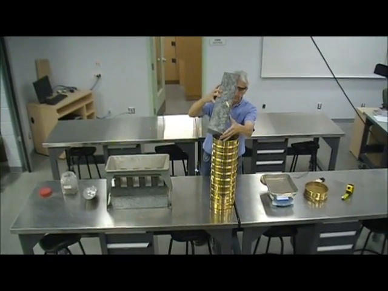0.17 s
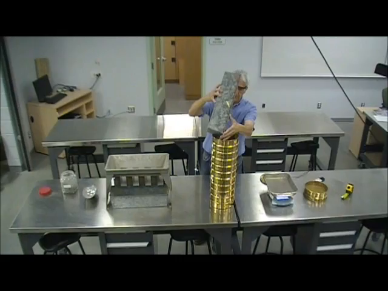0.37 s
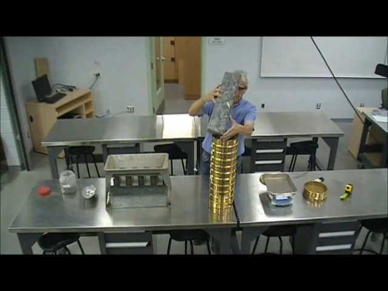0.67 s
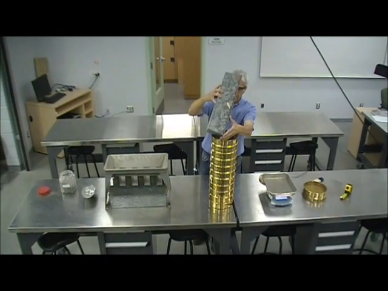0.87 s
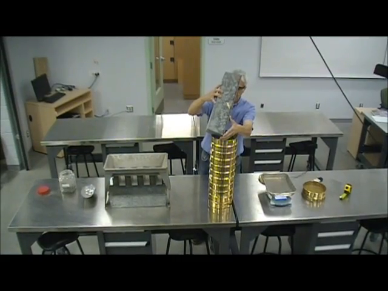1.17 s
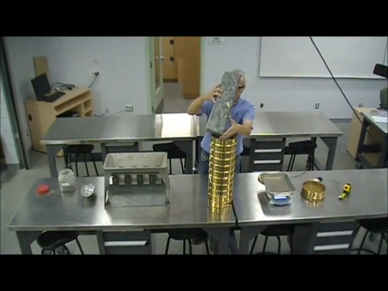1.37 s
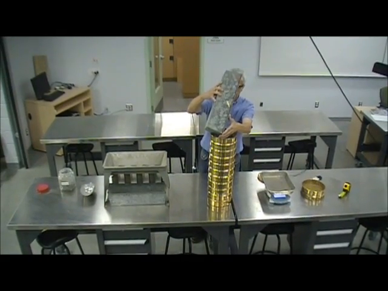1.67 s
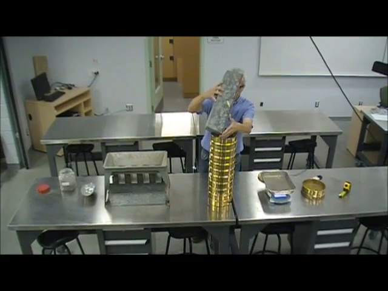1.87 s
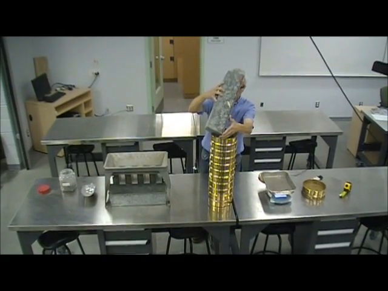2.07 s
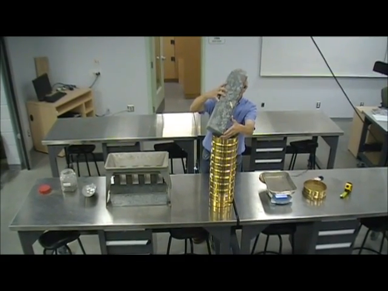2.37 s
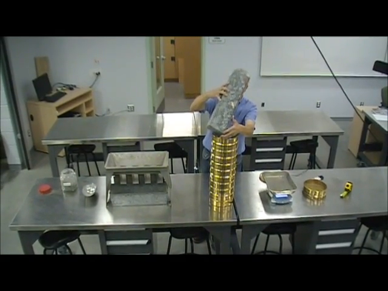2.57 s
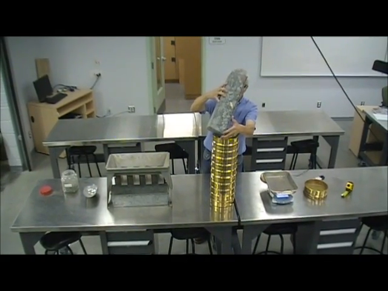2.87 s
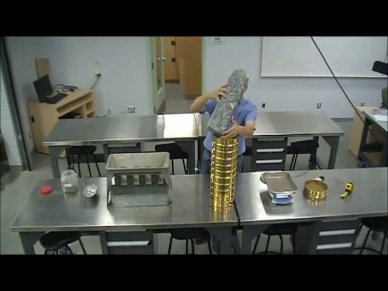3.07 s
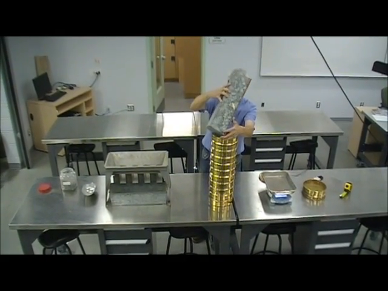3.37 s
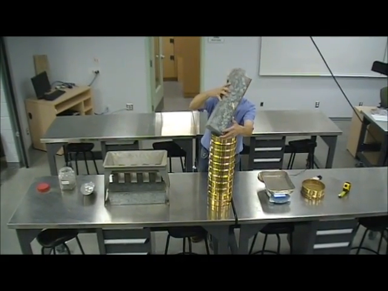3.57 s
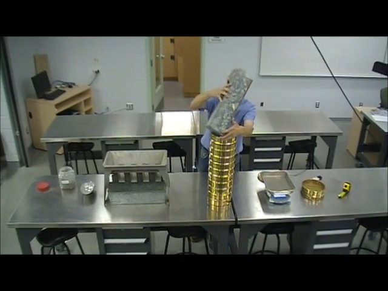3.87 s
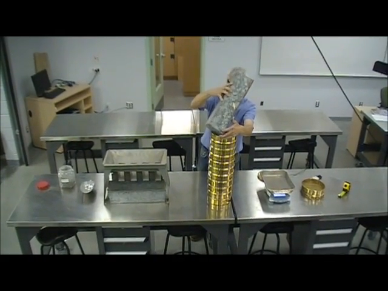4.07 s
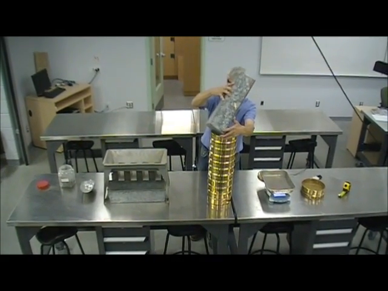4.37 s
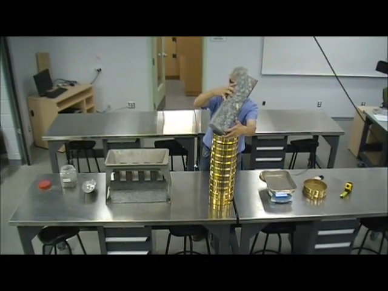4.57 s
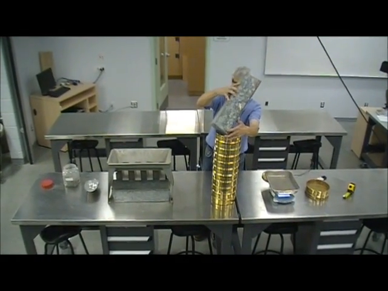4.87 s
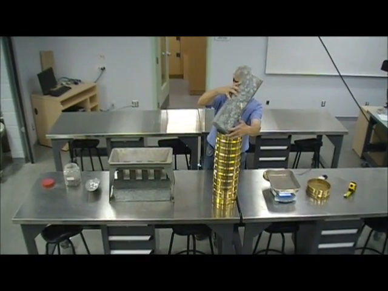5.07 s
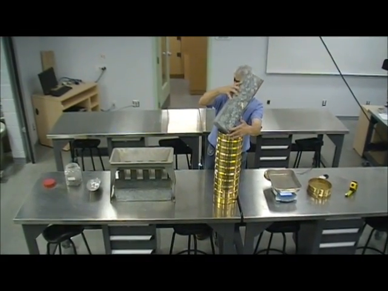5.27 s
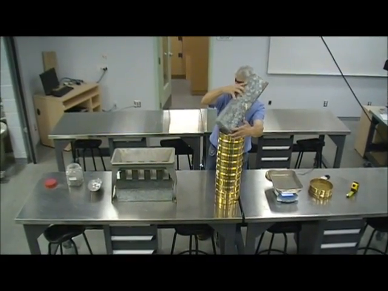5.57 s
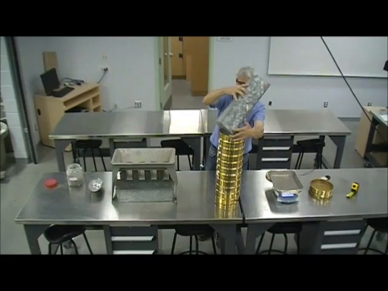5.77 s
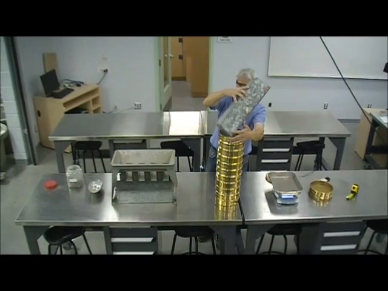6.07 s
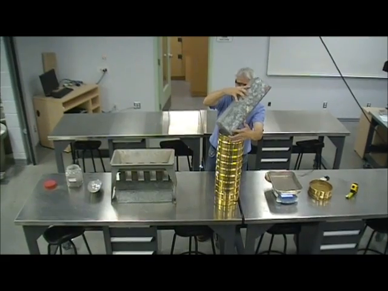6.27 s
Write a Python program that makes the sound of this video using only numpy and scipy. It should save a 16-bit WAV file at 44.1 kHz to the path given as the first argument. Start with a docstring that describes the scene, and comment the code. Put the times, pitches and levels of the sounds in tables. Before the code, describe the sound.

A dense, bright clatter of stones on wire mesh starts at once, mixed with hissing sand and faint hollow pan rumbles. It eases, surges again midway, then breaks up into separate ticks before dying out. Steady broad ventilation noise is left, swelling and then jumping louder near the end. Heard from several metres off in a reflective lab, with short splashy room decay in stereo.

```python
"""Stones and sand pour from a tilted metal pan into a stack of brass sieves in a hard-walled lab.
Each stone is a noise crack on the mesh plus decaying sines for the frames; sand is a hiss of dense ticks.
Loads sliding in the pan are noise through its hollow modes; sparse random taps give the wall reflections.
The pour thins to single stones over ventilation noise; the noise floor is heard to creep up, then step up.
A camera with two microphone ports stands some metres off."""
import sys
import numpy as np
from scipy import signal
from scipy.fft import rfft, irfft
from scipy.io import wavfile
from scipy.ndimage import uniform_filter1d

SR = 44100
rng = np.random.default_rng(int(sys.argv[2]) if len(sys.argv) > 2 else 0)


def put_to_file(sound):
    """Save the sound as 16-bit audio at rate SR, in the file named by the first command-line argument."""
    columns = np.atleast_2d(sound).T  # one column per channel
    safe = np.clip(columns, -1, 1)
    whole_steps = np.round(safe * 32767)
    wavfile.write(sys.argv[1], SR, whole_steps.astype(np.int16))


N = 284004  # length in samples


def amp(db):
    """Turns dB into gain."""
    return 10 ** (np.asarray(db) / 20)


def evened(x):
    """Scales to rms 1."""
    return x / np.sqrt(np.mean(x ** 2) + 1e-20)


def read(points, hz):
    """Reads a (frequency [Hz], value) table along a log-frequency axis."""
    f, value = np.transpose(points)
    return np.interp(np.log(hz + 1), np.log(f + 1), value)


def colour(x, db_at):
    """Filters along the last axis by a function from Hz to dB."""
    n = x.shape[-1]
    return irfft(rfft(x) * amp(db_at(np.fft.rfftfreq(n, 1 / SR))), n)


def add(mix, s, sound):
    """Mixes a sound in at s seconds."""
    part = mix[round(s * SR):][:len(sound)]
    part += sound[:len(part)]


def octaves(hz):
    """Distance from 6 kHz in octaves, held constant outside the mesh band."""
    return np.log2(np.clip(hz, 1600, 11500) / 6000)


# spectrum of the ventilation: (frequency [Hz], relative density [dB per Hz])
AIR_SPECTRUM = [(30, -9), (75, -50), (118, -5), (200, -3.5), (290, -2.5), (500, -2.5), (1390, -7.5),
                (3490, -10.5), (4300, -12.5), (9970, -21), (16000, -34.5)]
# likeness of the ventilation at the two ports: (frequency [Hz], correlation [-1 to 1])
AIR_LIKENESS = [(60, 0.81), (130, 1), (290, 0.74), (640, 0.58), (1410, 0.24), (3100, 0.47), (6820, 0.22),
                (15000, 0.12)]
AIR_LEAD_S = 4 / SR  # what both ports share reaches the left one first
# level of the noise floor as heard: even at first, then a slow rise
FLOOR_DB, FLOOR_RISE_DB_PER_S, FLOOR_RISE_FROM_S = -50, 2, 4.52
FLOOR_STEP_S, FLOOR_STEP_DB = 5.595, 7  # then a sudden step in the level heard


def ventilation(patchy_db=0.5):
    """Broad air noise: random short-time spectra with drifting patches, partly shared by the ports."""
    frames, hz = N // 256 + 5, np.fft.rfftfreq(1024, 1 / SR)
    a, b, c, d, patches = rng.standard_normal((frames, 513, 5)).T
    patches = uniform_filter1d(patches, size=12, axis=0)
    patches = evened(uniform_filter1d(patches, size=10, axis=1))
    same = np.clip(read(AIR_LIKENESS, hz), -1, 1)[:, None]
    left = a + 1j * b
    later = left * np.exp(-2j * np.pi * hz * AIR_LEAD_S)[:, None]
    right = same * later + np.sqrt(1 - same ** 2) * (c + 1j * d)
    z = np.array([left, right]) * amp(read(AIR_SPECTRUM, hz)[:, None] + patchy_db * patches)
    noise = signal.istft(z, nperseg=1024, noverlap=768)[1][:, :N]

    t = np.arange(N) / SR
    rise_db = FLOOR_RISE_DB_PER_S * np.maximum(t - FLOOR_RISE_FROM_S, 0)
    level_db = FLOOR_DB + rise_db + FLOOR_STEP_DB * (t > FLOOR_STEP_S)
    port_db = np.array([[.8], [-.8]])  # a little more on the left
    return amp(level_db + port_db) * evened(noise)


# decay of the room: (frequency [Hz], time to fall 60 dB [s])
WALL_DECAY = [(400, 0.33), (1500, 0.56), (4000, 0.5), (9000, 0.43), (15000, 0.43)]
# reflected over direct sound: (frequency [Hz], level [dB])
REFLECTED = [(500, -4), (1000, 3), (2000, 2.5), (4000, 3.5), (6500, 3.5), (9000, 0), (14000, -2)]


def tail(gap=0.005):
    """Wall reflections: sparse taps of random sign, separate for each port, each band dying at its own speed."""
    taps = np.zeros((2, SR))
    slots = np.arange(0, SR - 20, 20)  # one tap in every 20 samples
    places = slots + rng.integers(0, 20, (2, len(slots)))
    np.put_along_axis(taps, places, rng.choice([-1., 1.], (2, len(slots))), 1)
    hz, t, z = signal.stft(taps, SR, nperseg=256)
    t60 = read(WALL_DECAY, hz)[:, None]
    z = z * amp(read(REFLECTED, hz)[:, None] - 60 * t / t60) / np.sqrt(t60)
    out = signal.istft(z, SR, nperseg=256)[1]
    after_gap = np.arange(out.shape[1]) > gap * SR
    return out * np.sqrt(20 * 6 * np.log(10) / SR) * after_gap  # energy about 1 at 0 dB


def lab(x, count=10):
    """Stones land in ever other places, so sets of reflection paths crossfade, one peaking each 0.2 s."""
    turn = np.arange(N) / SR * 5
    away = [abs((turn - k + count / 2) % count - count / 2) for k in range(count)]
    shares = [np.cos(np.pi / 2 * np.minimum(a, 1)) for a in away]  # squares sum to 1
    reflected = sum(signal.fftconvolve((x * share)[None], tail(), axes=1)[:, :N] for share in shares)
    return x + reflected


# hollow modes of the pan: (frequency [Hz], width [Hz])
PAN_MODES = [(420, 40), (500, 8), (570, 12), (700, 15.5), (860, 68)]
# loads that slide down the pan: (time [s], rumble level [dB], pitch [Hz], fall [dB per s])
SLIDING_LOADS = [(.22, -52.5, 614, 2), (.48, -47.5, 650, 26), (.8, -52, 670, 54), (1.07, -43.5, 602, 45),
                 (1.39, -49, 655, 46), (1.95, -58, 670, 30), (2.2, -63, 714, 27), (2.75, -44, 710, 150),
                 (2.81, -39.5, 616, 116), (3.02, -45.5, 600, 202), (3.17, -52.5, 700, 42),
                 (3.32, -51.5, 700, 82), (3.54, -55, 750, 120), (3.87, -57, 770, 45), (4.2, -51.5, 844, 85)]
SLIDE_RISE_DB_PER_S = 214  # swell ahead of each listed time


def pan(reach_hz=220):
    """Loads sliding in the pan shake its hollow modes, most those near the pitch of the load."""
    s, rumble_db, pitch_hz, fall = np.transpose(SLIDING_LOADS)
    hz, at, z = signal.stft(rng.standard_normal(N), SR, nperseg=2048)
    modes = np.sqrt(sum(1 / (1 + (2 * (hz - f) / width) ** 2) for f, width in PAN_MODES))[:, None]
    off_pitch_hz = hz[:, None] - np.interp(at, s, pitch_hz)
    z = z * modes / (1 + (2 * off_pitch_hz / reach_hz) ** 2)
    scrape = signal.istft(z, SR, nperseg=2048)[1][:N]
    since = np.arange(N) / SR - s[:, None]
    swell_db = rumble_db[:, None] + np.minimum(SLIDE_RISE_DB_PER_S * since, -fall[:, None] * since)
    return evened(scrape) * amp(swell_db.max(0))  # the loudest load sets the level


# the pour of sand and small stones, which also covers the mesh: (time [s], relative flow [dB])
POUR_FLOW = [(0, -15), (.13, -29.5), (.22, -19), (.58, -19.5), (.78, -18), (1.0, -21), (1.3, -17),
             (1.42, -22.5), (1.86, -22.5), (2.0, -20), (2.4, -27), (2.46, -22.5), (2.52, -31.5),
             (2.66, -30), (2.84, -24.5), (2.9, -21.5), (3.08, -15.5), (3.52, -21.5), (3.65, -27),
             (3.95, -26), (4.22, -33), (4.4, -36), (4.84, -48.5), (5.3, -79)]
# brightness at a full flow [dB per octave]; a thinner flow is duller, by so much per dB
FULL_DB, FULL_TILT_DB, TILT_PER_FLOW = -19, -0.5, 0.24


def stream(count=28, grit_per_s=300, spread_db=4.5, grit_db=-3, sand_db=-5, ring_db=-6, snap_db=3,
           sand_per_s=8000, tick_db=0.0):
    """Small stones land at random over the dense ticks of sand; both follow the flow."""
    s, flow_db = np.transpose(POUR_FLOW)
    tilt_db = FULL_TILT_DB + TILT_PER_FLOW * (flow_db - FULL_DB)
    size = amp(spread_db * np.minimum(rng.exponential(1, N), 3)) * (rng.random(N) < grit_per_s / SR)
    spot = rng.integers(0, count, N)  # each spot has its own strike
    flow = amp(np.interp(np.arange(N) / SR, s, flow_db, right=-120))

    grit = np.zeros(N)
    for k in range(count):
        woken_hz = 2000 * 2 ** rng.normal(0.475, 0.86, size=2)
        hit = strike(ring_db, 0, snap_db, woken_hz)
        grit += signal.oaconvolve(size * (spot == k), hit)[:N]

    ticks = rng.standard_normal(N) * amp(tick_db * np.minimum(rng.exponential(1, N), 3))
    ticks *= rng.random(N) < sand_per_s / SR
    sand = colour(ticks, lambda hz: read(MESH_COLOUR, hz))
    both = amp(grit_db) * evened(grit) + amp(sand_db) * evened(sand)
    hz, at, z = signal.stft(both, SR, nperseg=256)
    z = z * amp(octaves(hz)[:, None] * np.interp(at, s, tilt_db))
    return flow * signal.istft(z, SR, nperseg=256)[1][:N]


# colour of a crack on the mesh: (frequency [Hz], relative level [dB])
MESH_COLOUR = [(300, -31.5), (1000, -18), (1600, -10), (2400, -6.5), (2620, -9), (3000, -4), (3500, -8),
               (4200, -3.5), (7000, -1.5), (11000, 1.5), (13000, -5), (16000, -16.5)]
# modes of the sieve frames: (frequency [Hz], relative level [dB], time to fall 60 dB [s])
FRAME_MODES = [(1175, -15, .15), (1405, -9, .2), (1750, -4, .12), (1880, -7, .15), (2304, -5, .16),
               (2390, -4, .12), (2750, -6, .14), (2878, -6, .16), (3000, -5, .14), (3073, -1, .16),
               (3220, -5, .14), (3352, -5, .18), (3645, -9, .12), (3950, -3, .12), (3995, -3, .15),
               (4180, -4, .12), (4370, -5, .12), (4990, -5, .08), (5223, -5, .1), (5477, -2, .1),
               (5770, -5, .06), (6430, -3, .07), (8068, 0, .12), (8810, -3, .07), (9242, -3, .07),
               (9790, -3, .05), (10740, -3, .05), (11000, -2, .07), (12365, -5, .07)]
WAKE_DB, WAKE_OCTAVES = 10, 0.088  # extra level at a woken place in the ring, and its reach


def strike(ring_db, tilt_db, snap_db, woken_hz, snap=0.03, rattle=0.14, bounce_db=3.0, chip_db=2.5,
           split=0.0035):
    """One stone: a snap, a bouncing, gritty rattle on the wire, and the frame modes, a quarter second in all."""
    t = np.arange(SR // 4) / SR
    lumps_db = 2.2 * rng.standard_normal(24)  # each spot favours other bands
    lumps_hz = np.linspace(0, SR / 2, 24)
    chips = rng.standard_normal(len(t)) * amp(chip_db * np.minimum(rng.exponential(1, len(t)), 5))
    noise = colour(chips, lambda hz: read(MESH_COLOUR, hz) + tilt_db * octaves(hz)
                   + np.interp(hz, lumps_hz, lumps_db))
    bounces = np.interp(t, np.linspace(0, .25, 90), rng.standard_normal(90))
    snap_fade = amp(snap_db - 60 * t / snap)
    rattle_fade = amp(bounce_db * bounces - 60 * t / rattle)
    crack = evened(noise) * (snap_fade + rattle_fade) / 5

    hz, db, t60 = np.transpose(FRAME_MODES)[:, :, None]
    luck = rng.standard_normal((2, len(FRAME_MODES), 1))
    spread_db, chatter, loosen = 2, 1.8, .04  # loosen in s
    # loose frames chatter against each other and soon break up each ring
    knots = rng.standard_normal((len(FRAME_MODES), 22))
    beats = 1 + chatter * np.minimum(t / loosen, 1) * knots[:, (t * 4 * 22).astype(int)]
    beats = uniform_filter1d(beats, size=200, axis=1)
    nearness = np.exp(-(np.log2(hz / woken_hz) / WAKE_OCTAVES) ** 2)
    wake_db = WAKE_DB * nearness.max(1, keepdims=True)
    ring = amp(db + wake_db + spread_db * luck[0] - 60 * t / t60) * beats
    ring = ring * np.sin(2 * np.pi * hz * (1 + split * luck[1]) * t)
    rise = 0.0016 * amp(-1.3 * snap_db)  # glancing stones with little snap come in softly
    return (crack + amp(ring_db) * ring.mean(0)) * np.minimum(t / rise, 1)


# the loud stones: (time [s], relative blow [dB], relative ring of the frames [dB],
# first snap over the rattle [dB], first woken place in the ring [Hz], second woken place [Hz])
LOUD_STONES = [(0.0892, -13.5, -23, -5, 6430, 1880), (0.1519, -11.5, -27, -5, 2410, 4990),
               (0.2107, -10, -20, 7.5, 8068, 2304), (0.3227, -9.5, -11, -5, 6430, 3073),
               (0.3416, -17.5, -15, 15.5, 3073, 5477), (0.4548, -12.5, 1, -3, 5477, 3170),
               (0.495, -5, 0, -1, 3460, 4060), (0.5178, -9.5, 1.5, -3, 3970, 2310),
               (0.595, -10.5, -13, 1, 3073, 4180), (0.6627, -4.5, -6.5, -6, 1750, 3073),
               (0.7209, -9.5, -5, -0.5, 3970, 3073), (0.7804, -17, -3, 16, 4020, 8068),
               (0.8136, -14, 3, 0, 3970, 5477), (.857, -8, -12, -1, 1750, 3950),
               (0.8869, -7.5, -11, -8.5, 2390, 9790), (.932, -15, -14, -1, 8068, 3970),
               (1.041, -12, -6, 2, 3940, 3352), (1.0916, -12.5, -1, 4, 1880, 3060),
               (1.139, -12.5, -12, 9, 3073, 1750), (1.177, -8, -15, -4.5, 11200, 3970),
               (1.2603, -9.5, -5, 4.5, 3970, 4280), (1.284, -12, -1, -1, 1750, 3970),
               (1.3395, -8.5, -1, 0.5, 1750, 2980), (1.3761, -9.5, -9, -3, 1750, 3220),
               (1.435, -13.5, -5, -1, 1750, 6430), (1.4697, -12, -16, 1, 1750, 3352),
               (1.51, -8, -6, -8, 1750, 3050), (1.5724, -22.5, -4, 19, 1750, 4990),
               (1.5873, -15, 7, 10, 1720, 3000), (1.6584, -18.5, -7, 7.5, 5477, 2750),
               (1.695, -17, 8, 7.5, 8068, 2390), (1.7589, -13.5, -4, 4, 3000, 1405),
               (1.812, -15, -3, 5.5, 3930, 1750), (1.8346, -11.5, 0.5, 3, 2980, 1800),
               (1.8962, -15.5, -11, 2, 5400, 3100), (1.9987, -16, -6, 10, 3073, 4990),
               (2.0635, -17, -21, 8, 4990, 2878), (2.0843, -14.5, -1, 7, 3100, 1750),
               (2.1141, -13, -8, 0, 3073, 8068), (2.1437, -13.5, -18, 4, 4180, 1880),
               (2.196, -5.5, -8, -1, 3352, 4180), (2.2436, -7, -14, -6, 2878, 1750),
               (2.258, -12.5, -10, 4, 4370, 3073), (2.312, -9.5, 0, -1, 1750, 2780),
               (2.317, -17.5, -4, 12.5, 1730, 2780), (2.3725, -13.5, -4, 5.5, 3950, 3020),
               (2.5538, -24.5, -17, 11.5, 2878, 3073), (2.601, -16.5, -24, -7, 3073, 8068),
               (2.6747, -29, -8, 15, 1750, 3970), (2.6935, -11, 0, -4, 4000, 8068),
               (2.7685, -25.5, -8, 11, 3970, 11000), (2.8472, -14, 1, 2, 4300, 2370),
               (2.856, -17, -15, 15, 4180, 3950), (2.8873, -10, 3.5, -8, 3970, 8068),
               (2.9576, -14, 3, -1, 3300, 3970), (2.9903, -10.5, -8, 2, 1750, 5477),
               (3.0325, -9.5, -15, -1.5, 4370, 8068), (3.066, -8, 3, -7, 3250, 1930),
               (3.074, -15, 1, 6, 3250, 4180), (3.123, -10, -8, 2.5, 3352, 3073),
               (3.2038, -12.5, -5, 1, 1900, 4200), (3.2745, -7.5, -7, -4, 1880, 2840),
               (3.334, -16.5, 0, -2, 3100, 2820), (3.4, -16, -2.5, 0, 3073, 4700),
               (3.5079, -14.5, -8, 0, 3073, 2878), (3.5379, -5.5, -13, -9, 3970, 3000),
               (3.599, -17.5, -4, -7, 3100, 2260), (3.677, -11, -14, 7, 3352, 1880),
               (3.778, -14, -5, -1, 1750, 1880), (3.7894, -10.5, -7, 7.5, 1750, 3073),
               (3.8461, -10.5, -15, -9, 5440, 1750), (3.966, -10, -8.5, 2.5, 3000, 2770),
               (4.055, -21.5, -3, 14, 1760, 3050), (4.17, -9, 0, 3.5, 1750, 2970),
               (4.2283, -16, 3, 1, 8068, 2304), (4.2806, -20, 0.5, 11.5, 1740, 4300),
               (4.3311, -15, -8, -3.5, 1750, 11000), (4.392, -25, -6, 1, 4180, 11000),
               (4.409, -19, -1.5, -3, 4200, 3400), (4.43, -23, -2, -2, 11000, 3000),
               (4.488, -17.5, -14, 3.5, 3970, 5477), (4.5157, -13, -7.5, -4, 1770, 5477),
               (4.641, -20.5, -9, -12, 3050, 5477), (4.6716, -27, -13, -3, 2878, 4700),
               (4.696, -31, -13, 10, 4370, 5500), (4.763, -35, -9, 9, 3073, 5477),
               (4.8674, -53, -3, 14, 3073, 8068), (4.938, -45.5, -6, 6, 8068, 11000),
               (4.95, -42, -14, 5, 8068, 11000), (5.039, -51, -15, 5, 8068, 11000)]
# brightness of a 0 dB blow on bare mesh [dB per octave]; lighter stones crack brighter, per dB of blow
STONE_TILT_DB, TILT_PER_BLOW = 1.5, -0.12
# a thick flow cushions the mesh and dulls the stones, per dB of flow above a bare mesh
CUSHION_PER_FLOW, BARE_DB = -0.36, -26.5
COVERED_S = 0.71  # the mesh starts bare and takes this long to be covered


def stones():
    """The loud stones, one by one, each duller where the flow lies thick on the mesh."""
    out = np.zeros(N)
    for s, db, ring_db, snap_db, *woken_hz in LOUD_STONES:
        flow_db = np.interp(s, *np.transpose(POUR_FLOW))
        cover_db = max(flow_db - BARE_DB, 0) * min(s / COVERED_S, 1) ** 2
        tilt_db = STONE_TILT_DB + TILT_PER_BLOW * db + CUSHION_PER_FLOW * cover_db
        add(out, s, amp(db) * strike(ring_db, tilt_db, snap_db, woken_hz))
    return out


# a narrow dip in all that the sieves send out: (frequency [Hz], width [Hz], level [dB])
SIEVE_DIP = (3520, 80, -10)
# colour of the microphone ports for the pour: (frequency [Hz], left minus right [dB])
PORT_COLOUR = [(60, -18), (110, -18), (200, -5), (380, 5), (700, 1), (1290, 1), (2380, 0.0), (4400, -2.5),
               (8120, -1.5), (15000, 2)]


def scene():
    """The pour in the lab, heard through two ports of unequal colour, over the ventilation."""
    dip_hz, width, depth_db = SIEVE_DIP
    sieves = stones() + amp(-9.5) * stream()
    sieves = colour(sieves, lambda hz: depth_db * np.exp(-((hz - dip_hz) / width) ** 2))
    left, right = lab(sieves + pan())
    left = colour(left, lambda hz: read(PORT_COLOUR, hz) / 2)
    right = colour(right, lambda hz: -read(PORT_COLOUR, hz) / 2)
    return np.array([left, right]) + ventilation()


EDGE_HZ = 15900  # upper band limit


def record(dry):
    """The microphone's bass cut below 80 Hz, then the band limit."""
    thin = signal.sosfilt(signal.butter(3, 80, "high", fs=SR, output="sos"), dry)
    low_pass = signal.firwin(511, EDGE_HZ, window=("kaiser", 9), fs=SR)
    return signal.oaconvolve(thin, low_pass[None], "same")


dry = scene()
out = record(dry)
put_to_file(out)
```